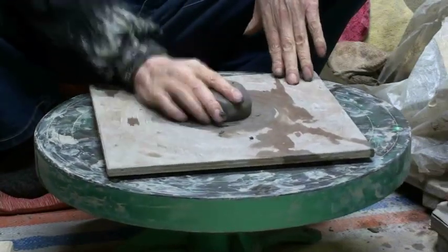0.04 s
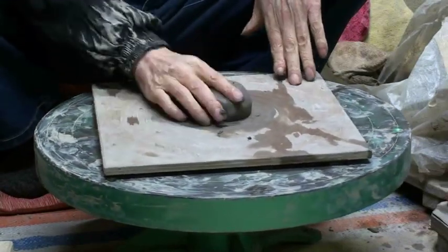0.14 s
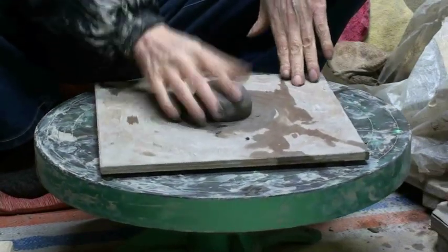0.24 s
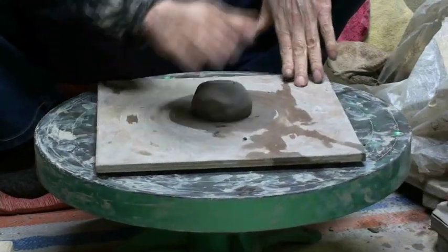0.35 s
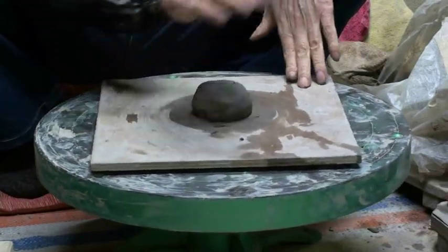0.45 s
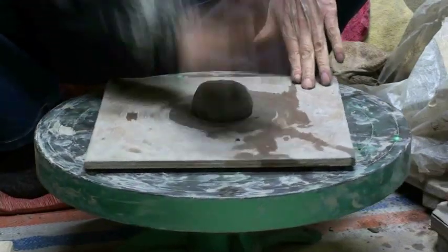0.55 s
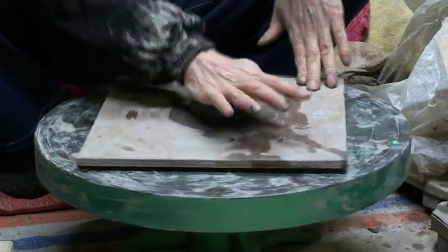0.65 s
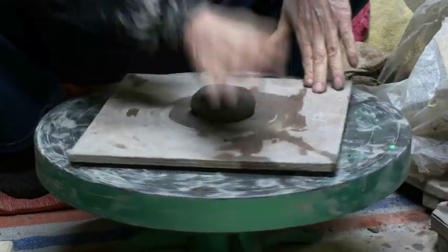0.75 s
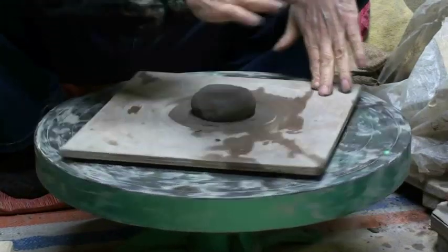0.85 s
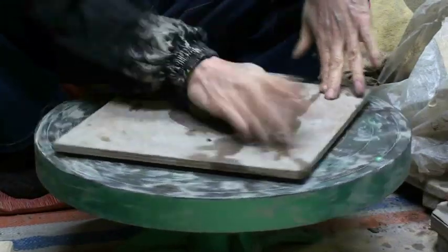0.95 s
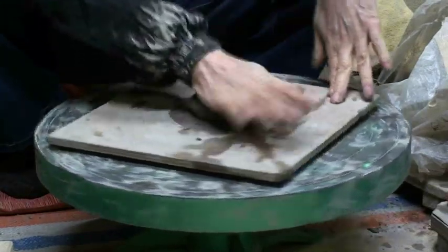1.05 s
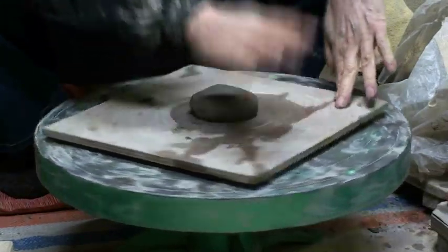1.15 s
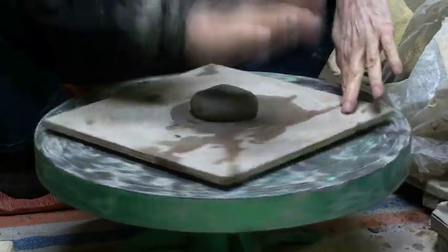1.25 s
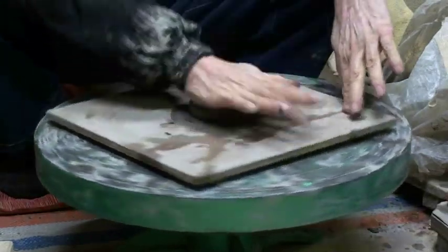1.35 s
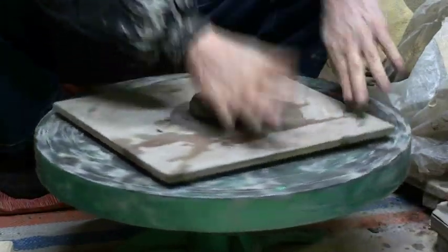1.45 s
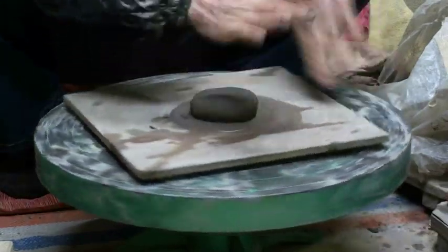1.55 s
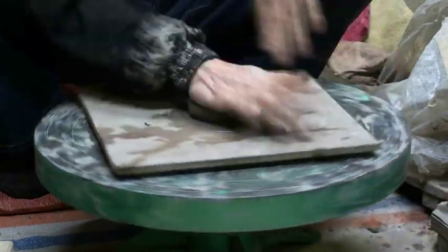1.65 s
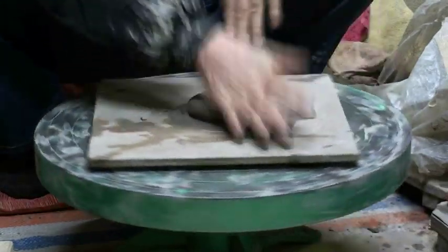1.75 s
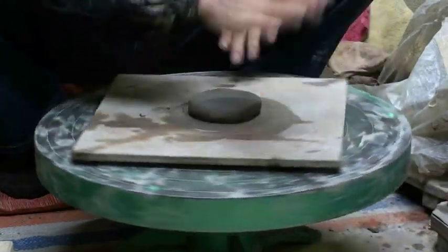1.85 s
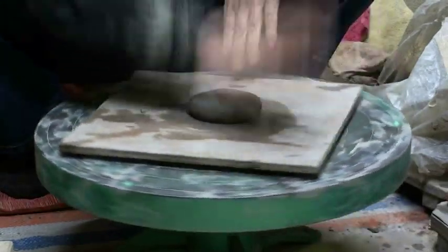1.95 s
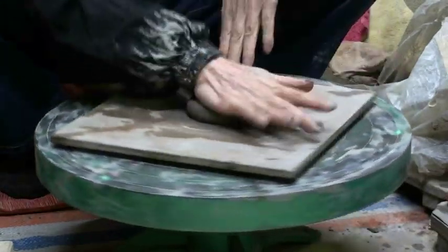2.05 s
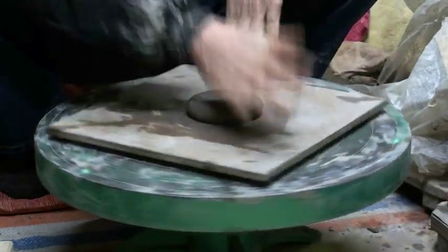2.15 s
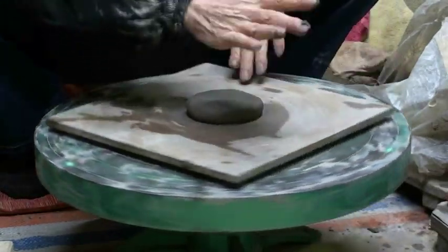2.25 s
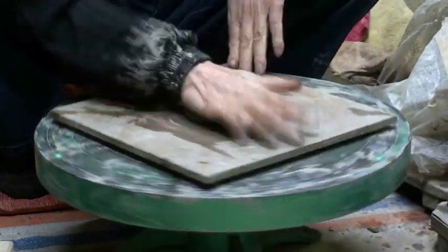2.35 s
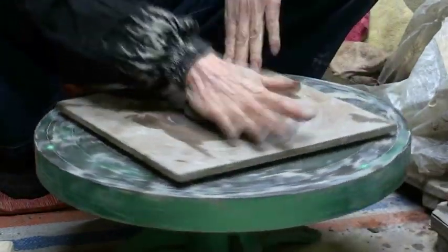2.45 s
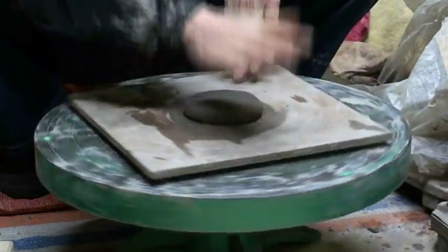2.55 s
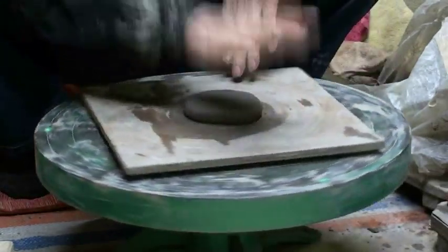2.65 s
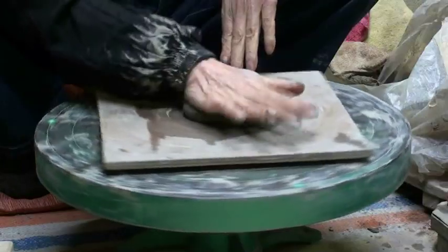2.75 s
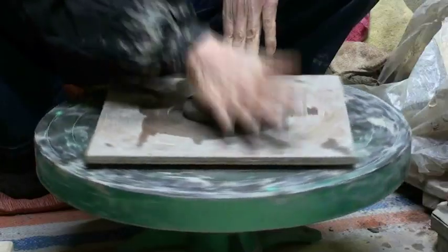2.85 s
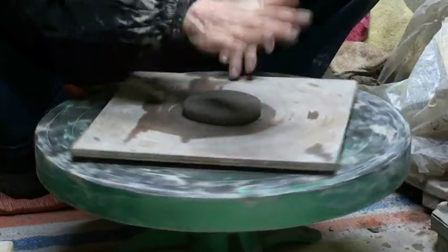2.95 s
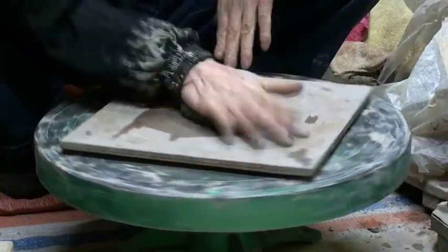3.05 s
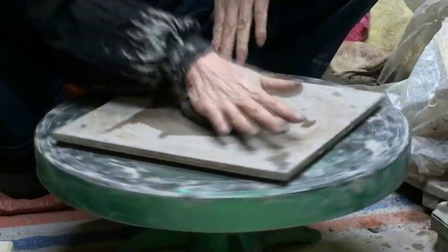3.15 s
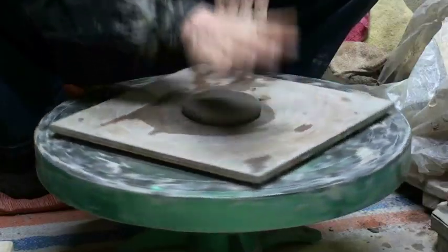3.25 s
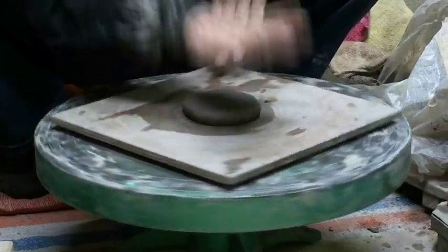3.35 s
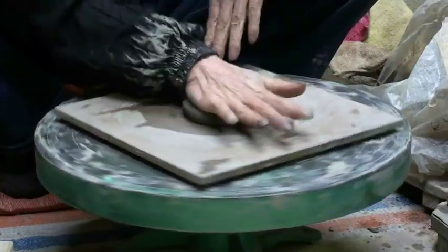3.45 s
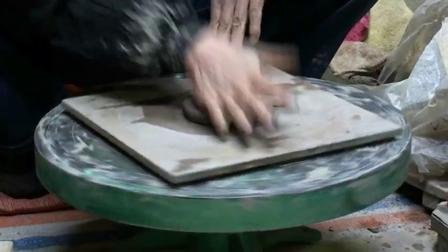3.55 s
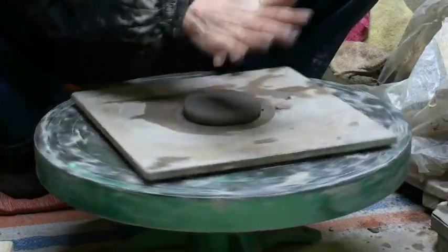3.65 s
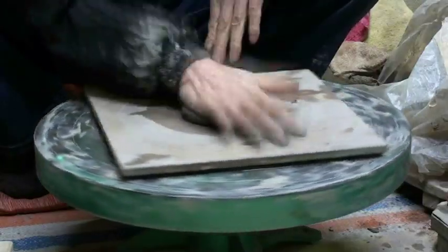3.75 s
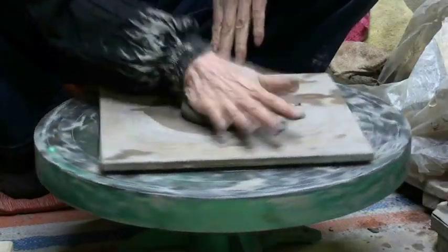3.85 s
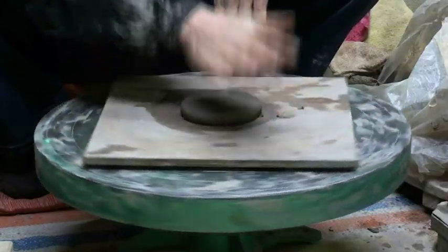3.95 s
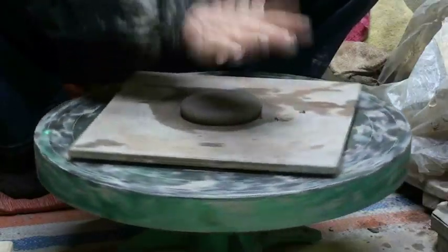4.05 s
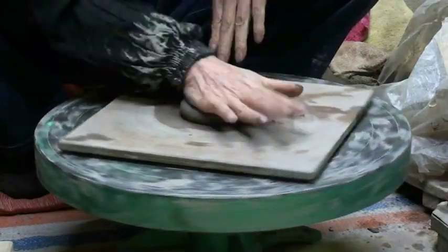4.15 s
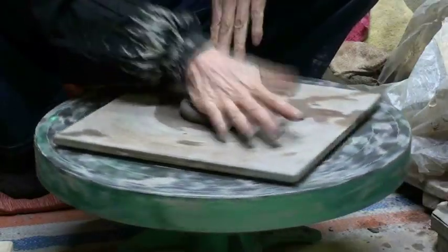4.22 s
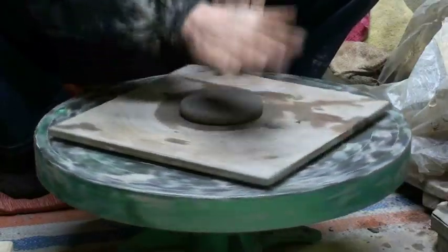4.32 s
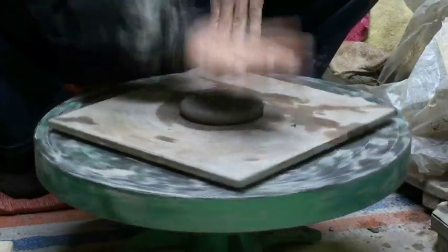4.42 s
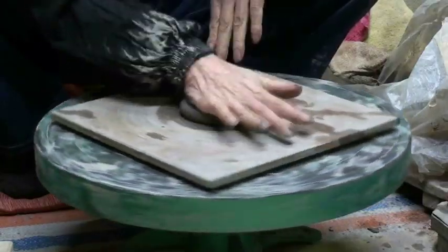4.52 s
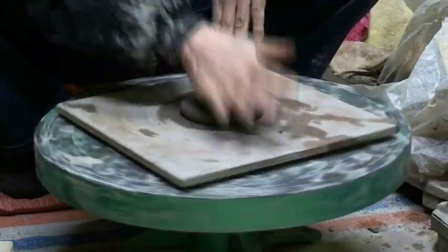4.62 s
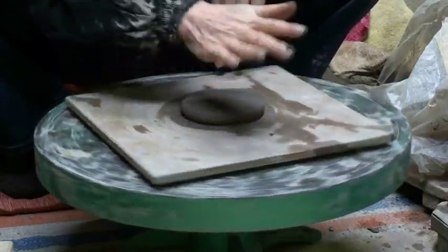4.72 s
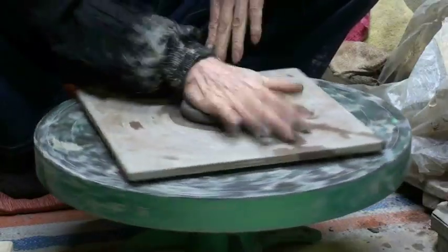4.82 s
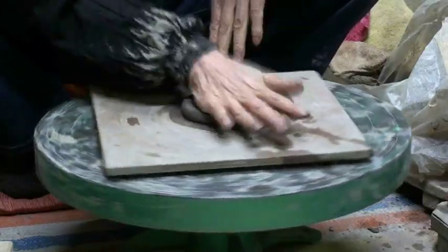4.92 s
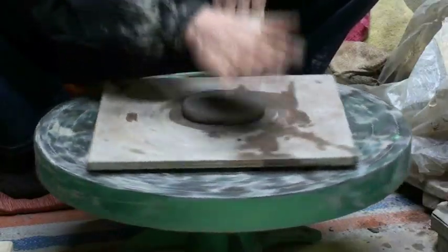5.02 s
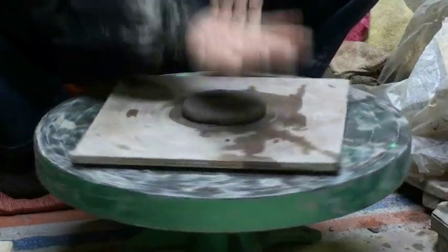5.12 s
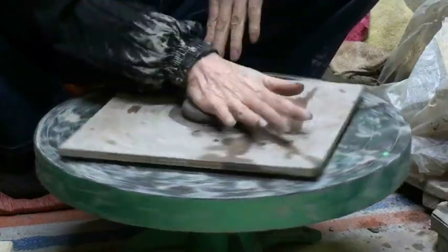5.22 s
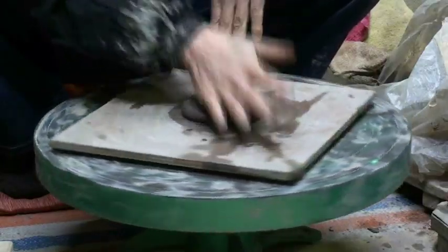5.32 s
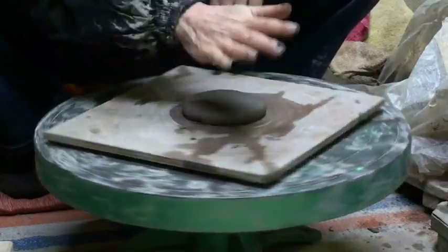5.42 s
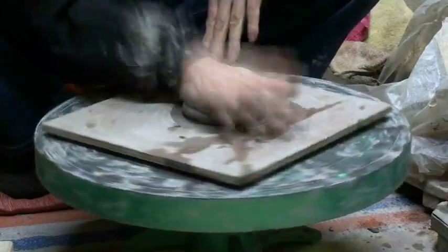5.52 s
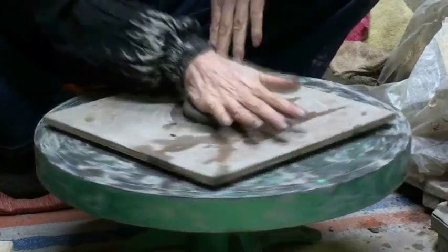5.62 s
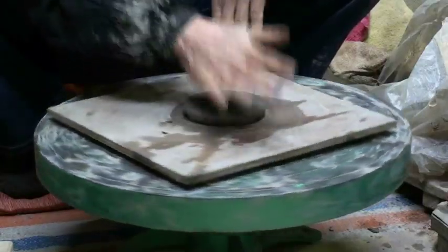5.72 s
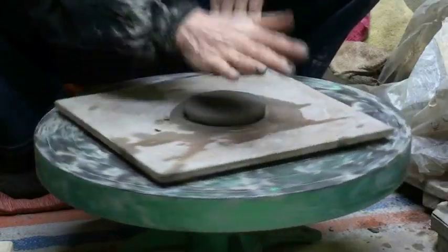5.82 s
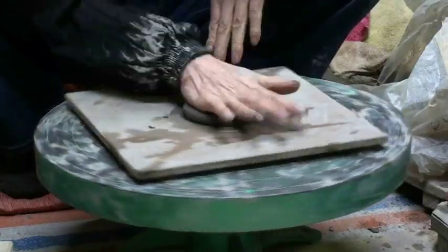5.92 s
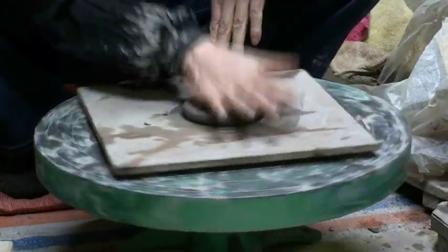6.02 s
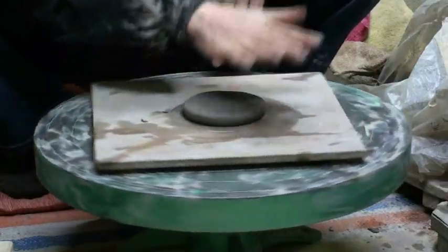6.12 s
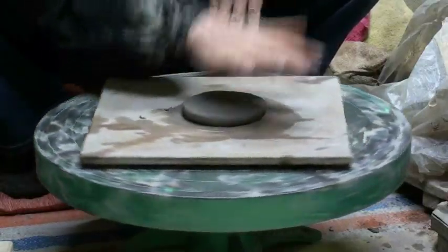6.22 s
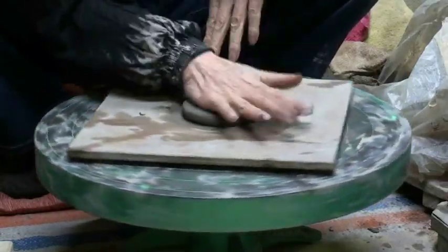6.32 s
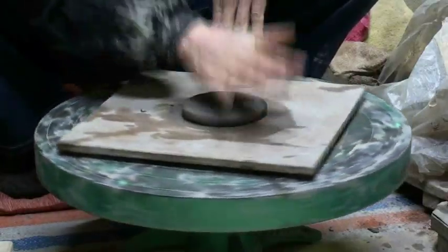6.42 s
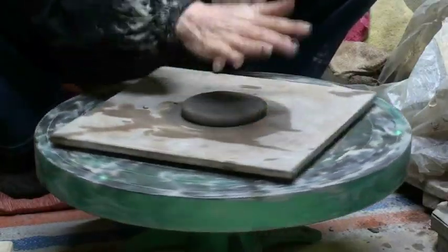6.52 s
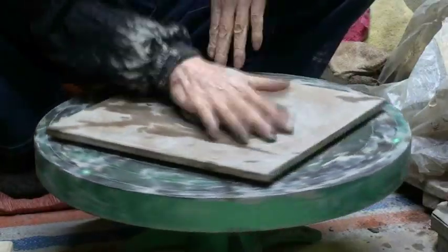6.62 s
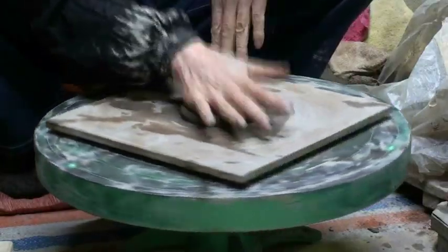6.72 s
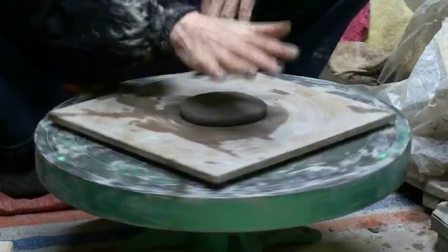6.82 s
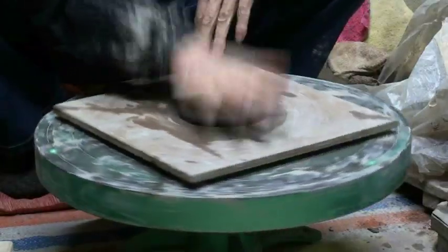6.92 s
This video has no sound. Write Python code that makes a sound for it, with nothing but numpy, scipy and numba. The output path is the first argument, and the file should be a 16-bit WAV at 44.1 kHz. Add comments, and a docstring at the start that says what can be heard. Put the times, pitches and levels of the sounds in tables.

```python
"""In a small bare studio an open hand slaps a lump of wet clay flat on a board on a potter's wheel.
Each slap is a set of noise bursts ringing the air pockets under palm and fingers, with sine thumps from the wheel.
Filtered noise makes the bearing's rumble, the board's grazes and the studio's hiss; a faint hum wavers below.
Echoes, standing waves and a short tail make the room, and the recorder's limiter flattens the loud cracks."""
import sys
import numpy as np
from scipy import signal
from scipy.fft import rfft, irfft
from scipy.io import wavfile
from scipy.ndimage import uniform_filter1d, minimum_filter1d
from numba import njit

SR = 44100
rng = np.random.default_rng(int(sys.argv[2]) if len(sys.argv) > 2 else 0)


def pcm_store(signal):
    """Save signal as 16-bit PCM."""
    levels = np.round(np.clip(np.atleast_2d(signal), -1, 1) * 32767)
    wavfile.write(sys.argv[1], SR, levels.astype(np.int16).T)


N = 307377
TIME = np.arange(N) / SR

# slaps of the open hand, levels relative: (t/s, force/dB, cupping of the palm/dB, weight/dB,
# finger gap f/Hz, finger gap level/dB, wet skin f/Hz, wet skin level/dB)
SLAP_EVENTS = [(.0545, 31.5, 1.5, 3, 3250, 29, 5800, 27), (0.5895, -16, 0.5, -18, 3150, -4.5, 7600, 1.5),
               (0.9549, 0.5, 0, -13, 3100, 9.5, 6500, 13.5), (1.311, 6.5, 3.5, -18, 3800, 23, 7000, 22.5),
               (1.6567, 19.5, -2.5, -6, 3900, 25.5, 8300, 25),
               (2.0282, 14.5, 1.5, 2, 2150, 8.5, 7150, 16.5), (2.3935, 17.5, 0, 0, 3450, 22.5, 7600, 25.5),
               (2.749, 17.5, -6.5, -1.5, 3220, 23.5, 8300, 23),
               (3.0967, 15, -6.5, -2.5, 2430, 21.5, 6800, 23.5),
               (3.451, 27, -1.5, -1.5, 2390, 24, 6650, 22), (3.809, 16, -1.5, -3, 2360, 19, 7100, 21),
               (4.162, 13.5, -1.5, -7, 2320, 12, 7050, 16), (4.5117, 10, 0.5, -2.5, 1780, 17.5, 7100, 23),
               (4.8667, 10.5, 0, -1.5, 2780, 13.5, 7400, 18), (5.2235, 15, .5, -1, 2040, 18.5, 8750, 28.5),
               (5.5893, 12, -1.5, -5, 3180, 17, 6870, 23), (5.9453, 25, -1.5, -5.5, 2050, 23, 8000, 24),
               (6.3286, 22.5, 5, -7, 4000, 20.5, 7050, 20.5), (6.671, 24, 2.5, -5.5, 2650, -26, 6850, 19)]


def undb(db):
    """Decibels to gain."""
    return 10 ** (np.asarray(db) / 20)


def unit(x):
    """Scale to rms 1."""
    return x / np.sqrt(np.mean(x ** 2))


def add(track, s, sound):
    """Mix a sound into a track at time s."""
    i = max(int(s * SR), 0)
    track[i:i + len(sound)] += sound[:N - i]


def resonate(x, hz, width_hz):
    """One resonance, gain 1 at its centre."""
    return signal.lfilter(*signal.iirpeak(hz, hz / width_hz, fs=SR), x)


def colour(x, points, size=2048):
    """Causal minimum-phase filter that follows (f/Hz, level/dB) points."""
    hz, db = np.transpose(points)
    grid = np.maximum(np.arange(size // 2 + 1) * SR / size, 1)
    level_db = np.interp(np.log(grid), np.log(hz), db)
    cepstrum = irfft(np.log(undb(level_db)))
    # folding the cepstrum onto positive time makes the filter causal
    cepstrum[1:size // 2] *= 2
    cepstrum[size // 2 + 1:] = 0
    response = irfft(np.exp(rfft(cepstrum)))
    return signal.fftconvolve(x, response)[:len(x)]


def walk(rate):
    """Slow chance: random levels at the given rate (Hz), held and slewed."""
    k = int(SR / rate)
    held = np.repeat(rng.standard_normal(N // k + 1), k)
    return 0.52 * uniform_filter1d(held, k)[:N]


def spread(source, side_db):
    """Two draws of a source as middle and side; the side is weak in the bass, so the bass stays central."""
    side = colour(source(), [(70, -8), (250, 0.0), (1000, 10.5), (6000, 1.5), (12000, -3.5)])
    return source() + undb(side_db) * side * np.array([[1], [-1]])


def studio(hiss_db=-62, hum_rate_hz=15, hum_wander_rad=1.9):
    """The empty studio: even hiss of shaped noise, and hum tones that waver as their phase wanders."""
    # colour of the hiss: (f/Hz, level/dB per Hz, relative)
    hiss_colour = [(15, -38), (25, -13.5), (79, -1), (181, -17), (257, -10), (309, -14.5), (394, 1.5),
                   (462, -13.5), (790, -7.5), (1150, -14.5), (1670, -8), (1860, -13.5), (2780, -13),
                   (12100, -16.5), (15000, -53)]
    # faint wavering hum tones: (f/Hz, level/dB)
    hum_tones = [(242, -72), (398, -80), (786, -77)]
    hum = np.zeros(N)
    for hz, db in hum_tones:
        phase = 2 * np.pi * hz * TIME + hum_wander_rad * walk(hum_rate_hz)
        hum += undb(db) * unit(np.sin(phase))
    hiss = unit(colour(rng.standard_normal(N), hiss_colour))
    return undb(hiss_db) * hiss + hum


def spin(coast_s=0.6, idle_db=-68):
    """Rumble strength follows the wheel: it climbs in a push, then coasts down exponentially to a slow turn."""
    # pushes that spin the wheel: (start t/s, length t/s, rumble added by the end of the push, level/dB)
    pushes = [(.55, 0.89, -58), (4.255, 0.29, -56)]
    speed = undb(idle_db)
    for s, length_s, db in pushes:
        climb = np.clip((TIME - s) / length_s, 0, 1)
        coast = np.exp(-np.maximum(TIME - s - length_s, 0) / coast_s)
        speed = speed + undb(db) * climb * coast
    return speed


def bearing(uneven_db=-6.0, uneven_rate_hz=14, whirr_db=-4):
    """The bearing's rolling noise rumbles and sets the wheel head's resonances whirring, more after each push."""
    # resonances of the turning wheel head: (f/Hz, width f/Hz, level/dB, relative)
    head_modes = [(1028, 190, -1), (1164, 130, -6), (1823, 30, 2.5), (770, 40, -11)]
    rolling = rng.standard_normal(N)
    rumble = colour(rolling, [(30, -15), (65, 5.5), (120, 1.5), (180, -1.5), (260, 3),
                              (400, -6.5), (700, -2.5), (2500, -25.5), (8000, -45)])
    whirr = np.zeros(N)
    for hz, width_hz, db in head_modes:
        level = undb(db + uneven_db * walk(uneven_rate_hz))
        whirr += level * resonate(rolling, hz, width_hz)
    return (unit(rumble) + undb(whirr_db) * unit(whirr)) * spin()


def chatter(swell_s=0.0039, faint_low_db=-8, size=8192, count=8):
    """Light grazing contacts with the turning wheel head ring the board: narrow noise that swells and fades."""
    # resonances of the board, lower then upper: (f/Hz, width f/Hz)
    board_modes = [(1030, 70), (1820, 78)]
    # the clearest grazes: (t/s, level/dB, lower resonance against the upper/dB)
    clear = [(1.168, -57, -10), (1.253, -59, -4), (1.485, -58, 11), (1.575, -56, 3), (2.14, -57, -14),
             (3.341, -58, -6), (3.422, -55, -10), (6.148, -53.5, -14)]
    # span of the fainter, random grazes: (from t/s, to t/s, level against the rumble/dB)
    from_s, to_s, loose_db = (1.1, 2.4, -3.5)
    out, t, speed = np.zeros(N), TIME[:size], spin()
    swell = np.sqrt(t / swell_s) * np.exp(-t / (4 * swell_s))
    # one faint graze at a random moment in each equal part of the span
    starts = from_s + (to_s - from_s) * (np.arange(count) + rng.random(count)) / count
    faint = []
    for s in starts:
        rumble_db = 20 * np.log10(np.interp(s, TIME, speed))
        faint.append((s, loose_db + rumble_db, faint_low_db))
    for s, db, low_db in list(clear) + faint:
        for (hz, width_hz), mode_db in zip(board_modes, (low_db, 0)):
            ring = resonate(rng.standard_normal(size), hz, width_hz)
            ring = unit(resonate(ring, hz, 2 * width_hz))
            add(out, s, undb(db + mode_db) * ring * swell)
    return out


def thumps(rock_hz=67, rock_decay_s=0.058, rock_delay_s=0.0381, rock_db=-50,
           knock_hz=110, knock_decay_s=0.027, knock_delay_s=0.0016, knock_db=-46, size=16384):
    """The weight of the hand knocks the wheel, which rocks on its stand a moment later: two decaying sines."""
    out, t = np.zeros(N), TIME[:size]
    for s, _, _, weight_db, *_ in SLAP_EVENTS:
        knock_tune, rock_tune = 1 + 0.048 * rng.standard_normal(2)
        knock = np.sin(2 * np.pi * knock_hz * knock_tune * t) * np.exp(-t / knock_decay_s)
        rock = np.sin(2 * np.pi * rock_hz * rock_tune * t) * np.exp(-t / rock_decay_s)
        add(out, s + knock_delay_s, undb(weight_db + knock_db) * knock)
        add(out, s + rock_delay_s, undb(weight_db + rock_db) * rock)
    return out


def burst(decay_s, size=1024, count=6):
    """Skin closing on clay: a brief crackle of unit energy, evenly spread over all pitches."""
    fade = np.exp(-TIME[:size] / decay_s)
    x = rng.standard_normal(size) * fade
    # flatten the spectrum and shorten the crackle in turn
    for _ in range(count):
        flat = irfft(np.exp(1j * np.angle(rfft(x))))
        x = flat * np.minimum(10 * fade, 1)
    return x / np.sqrt(np.sum(x ** 2))


def fingers(q=1.44, contact_s=0.00049, settle_s=0.014, settle_db=-17.5, settle_hz=6400,
            scatter_db=3, count=2):
    """Single fingers snap onto the wet surface; other fingertips settle softly at random just after the palm."""
    # fingers that land clearly apart from the palm: (t/s, level/dB, f/Hz)
    snaps = [(2.0304, 9.5, 2880), (2.3966, 18.5, 6240), (2.751, 13, 3060), (3.099, 15.5, 6500),
             (3.1067, 8, 6440), (3.811, 14.5, 2440), (4.1652, 15, 7260), (4.5089, 11, 7100),
             (4.521, 7, 5030), (4.868, 10.5, 3140)]
    out = np.zeros(N)
    for s, db, hz in snaps:
        add(out, s, undb(db) * resonate(burst(contact_s), hz, hz / q))
    for s, *_, wet_db in SLAP_EVENTS:
        for late, scatter in zip(rng.random(count), rng.standard_normal(count)):
            tick = resonate(burst(contact_s), settle_hz, settle_hz / q)
            # the tick is set against the wet skin of its slap
            tick_db = wet_db + settle_db + scatter_db * scatter
            add(out, s + late * settle_s, undb(tick_db) * tick)
    return out


def slaps(contact_s=0.0016, touch_s=0.0021, touch_lead_s=0.002, touch_db=-22,
          hollow_hz=755, hollow_width_hz=190, smack_hz=1300, smack_width_hz=1300,
          smack_db=3, smack_growth=0.73, gap_q=3.2, wet_q=2.63,
          thud_hz=260, thud_width_hz=150, thud_db=2):
    """A light first touch, then the palm shuts, rings the pockets of air under it and thuds into the clay."""
    out = np.zeros(N)
    for s, force_db, cup_db, weight_db, gap_hz, gap_db, wet_hz, wet_db in SLAP_EVENTS:
        touch = (touch_lead_s, touch_db, burst(touch_s))
        palm = (0, 0, burst(contact_s))
        for lead_s, db, push in (touch, palm):
            thud = undb(thud_db + weight_db) * resonate(push, thud_hz, thud_width_hz)
            hollow = undb(force_db + cup_db) * resonate(push, hollow_hz, hollow_width_hz)
            # the broad smack grows more slowly than the force (dB per dB)
            smack_level = undb(smack_db + smack_growth * force_db)
            smack = smack_level * resonate(push, smack_hz, smack_width_hz)
            gap = undb(gap_db) * resonate(push, gap_hz, gap_hz / gap_q)
            wet = undb(wet_db) * resonate(push, wet_hz, wet_hz / wet_q)
            # neighbouring pockets swing in opposite directions
            add(out, s - lead_s, undb(db) * (hollow - thud - smack + gap - wet))
    return out


def room(x, t60_s=0.22, gap_s=0.0048, build_s=0.00046, mode_t60_s=0.21, side_db=-12.0,
         linger_db=-34, linger_t60_s=0.88, size=32768):
    """Direct sound, near echoes, standing waves and a dense short tail; a faint middle band lingers."""
    # diffuse echo of the walls: (f/Hz, level/dB)
    wall_colour = [(100, 4.5), (280, 0.5), (450, 3), (600, -4.5), (800, -0.5), (1000, 7), (1500, 3),
                   (4000, -3.5), (8000, -5.5), (14000, -10)]
    # echoes from the wheel, floor and body: (delay t/s, level/dB)
    near_echoes = [(.0014, -25.5), (.0036, -16), (.0106, -34.5), (.0129, -22), (0.0152, -17)]
    # standing waves around the wheel: (f/Hz, level/dB)
    standing_waves = [(282, 4), (318, 7.5), (345, 7), (495, 8.5), (550, 5.5), (577, 9.5), (642, -10.5),
                      (692, 7.5), (728, 8), (771, 12), (853, -26), (941, 0), (1035, -19), (1244, 15)]
    t = TIME[:size]
    late = np.maximum(t - gap_s, 0)
    fade = undb(-60 * late / t60_s) * (1 - np.exp(-late / build_s))
    linger = undb(linger_db - 60 * late / linger_t60_s) * (late > 0)
    tails = []
    for short, long in rng.standard_normal((2, 2, size)):
        tail = short * fade + resonate(long * linger, 1660, 930)
        tails.append(colour(tail, wall_colour) / np.sqrt(np.sum(fade ** 2)))
    mid = tails[0]
    side = undb(side_db) * colour(tails[1], [(300, -7.5), (1000, -3.0), (4000, 3.0), (12000, -1.5)])
    mid[0] += 1  # direct sound
    for delay_s, db in near_echoes:
        mid[int(delay_s * SR)] += undb(db)
    damping = np.log(1000) / mode_t60_s
    for k, (hz, db) in enumerate(standing_waves):
        # the factor makes db the gain at the peak; neighbours have opposite sign
        level = (-1) ** k * undb(db) * 2 * damping / SR
        mid += level * np.exp(-damping * t) * np.sin(2 * np.pi * hz * t)
    left = signal.fftconvolve(x, mid + side)[:N]
    right = signal.fftconvolve(x, mid - side)[:N]
    return np.array([left, right])


@njit
def recover(allowed, length):
    """The gain drops at once to what is allowed, then climbs straight back to 1 within length samples."""
    out, gain, step = np.empty(len(allowed)), 1., 0.
    for i in range(len(allowed)):
        gain = min(gain + step, 1.)
        if allowed[i] < gain:
            gain = allowed[i]
            step = max(step, (1 - gain) / length)
        if gain >= 1:
            step = 0.
        out[i] = gain
    return out


def scene():
    """Hand and clay in the room, over the wheel and the quiet studio."""
    # tone of hand, clay and board together: (f/Hz, level/dB)
    hand_tone = [(60, 10.5), (170, -4.5), (290, 10), (420, 1), (600, 14), (1000, -4), (2000, 1), (4000, -4),
                 (5300, -10), (7000, -5), (10000, -9), (13500, -14.5), (15500, -72)]
    hand = colour(slaps() + fingers(), hand_tone)
    wheel = thumps() + chatter() + spread(bearing, side_db=-18.5)
    return room(hand) + wheel + spread(studio, side_db=-9.5)


def record(dry, ceiling_db=-11.0, recover_s=0.031, rumble_hz=42, top_hz=14900, size=24):
    """A look-ahead limiter ducks under loud cracks and lets the room swell back; both ends of the range are cut."""
    low_cut = signal.butter(3, rumble_hz, "high", fs=SR, output="sos")
    high_cut = signal.ellip(8, .2, 70, top_hz, fs=SR, output="sos")
    dry = signal.sosfilt(low_cut, dry)
    # both channels share one gain
    peak = np.abs(dry).max(axis=0) + 1e-9
    gain = recover(np.minimum(undb(ceiling_db) / peak, 1), float(recover_s * SR))
    # centred windows bring each drop forward and round it
    gain = uniform_filter1d(minimum_filter1d(gain, size), size)
    return signal.sosfilt(high_cut, dry * gain)


dry = scene()
out = record(dry)
pcm_store(out)
```